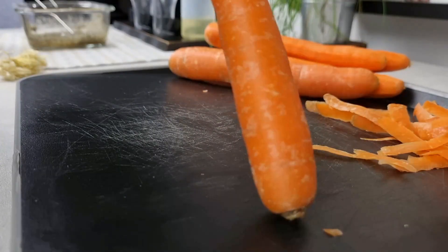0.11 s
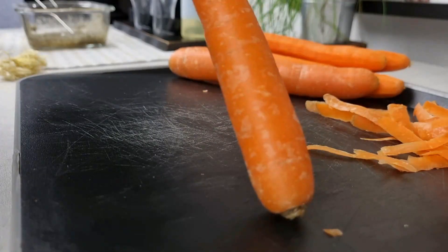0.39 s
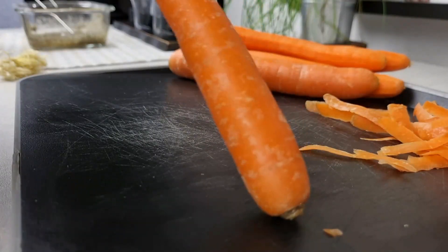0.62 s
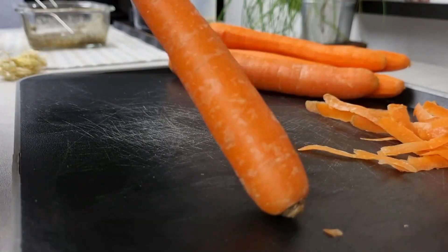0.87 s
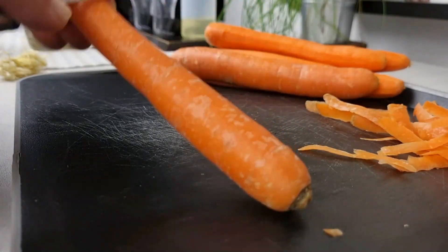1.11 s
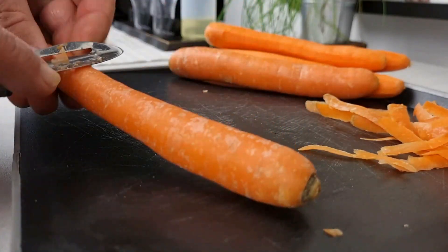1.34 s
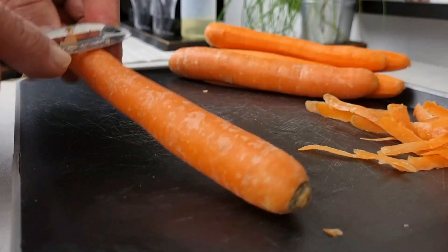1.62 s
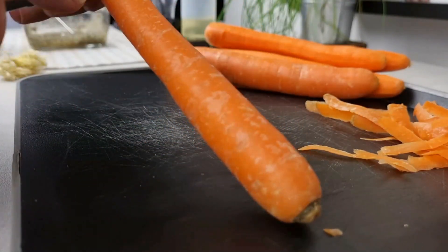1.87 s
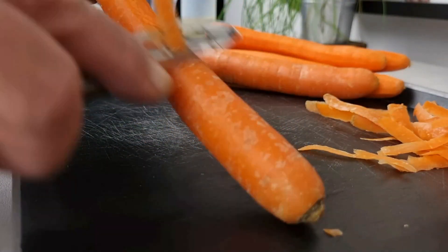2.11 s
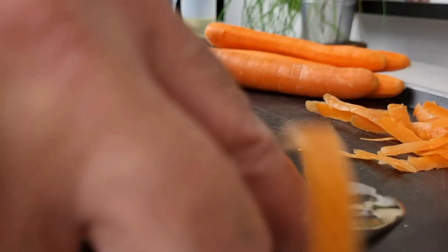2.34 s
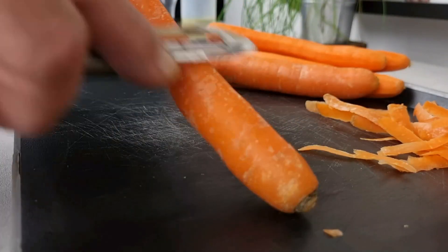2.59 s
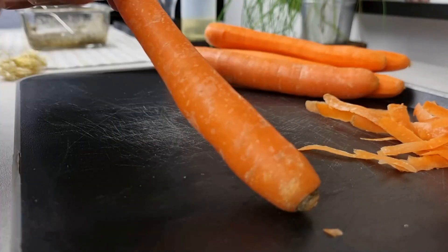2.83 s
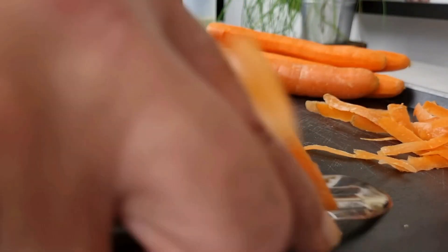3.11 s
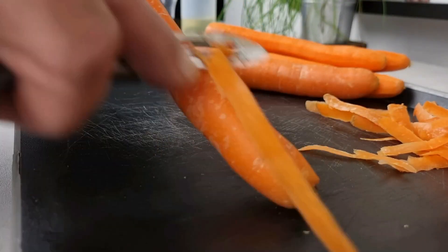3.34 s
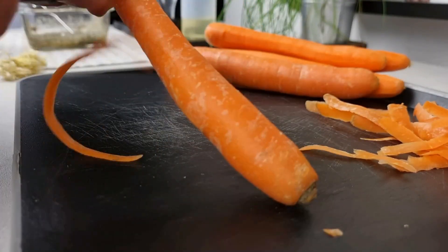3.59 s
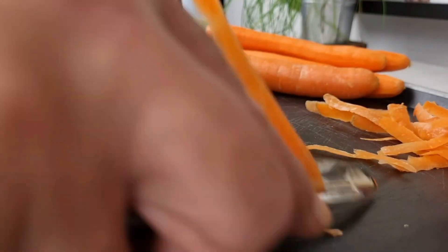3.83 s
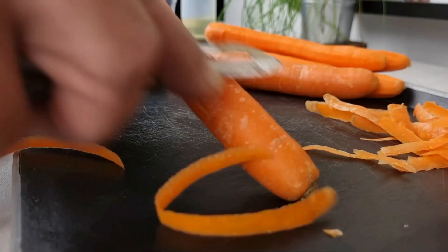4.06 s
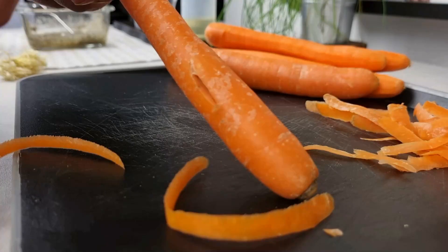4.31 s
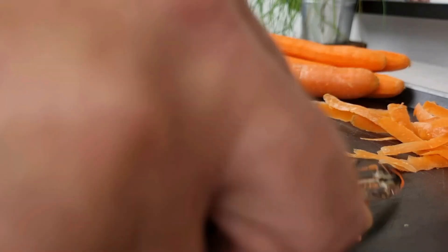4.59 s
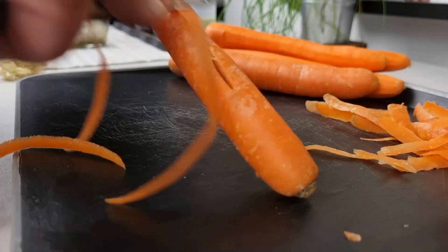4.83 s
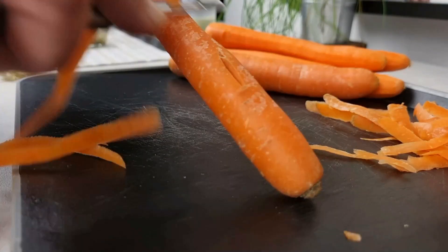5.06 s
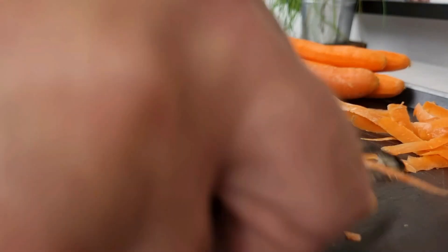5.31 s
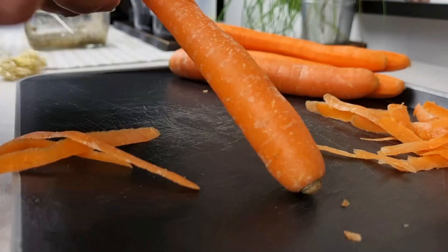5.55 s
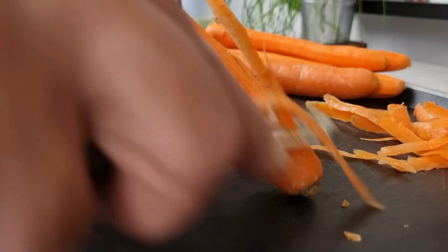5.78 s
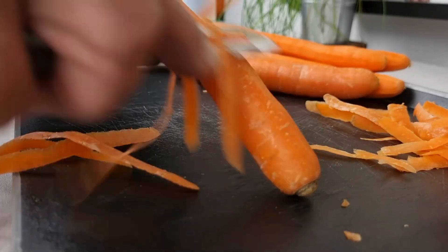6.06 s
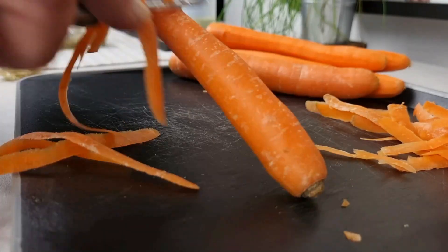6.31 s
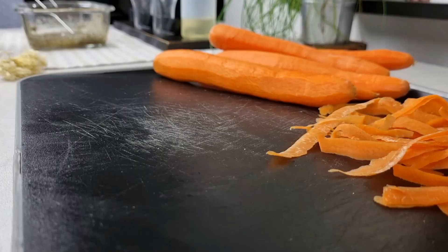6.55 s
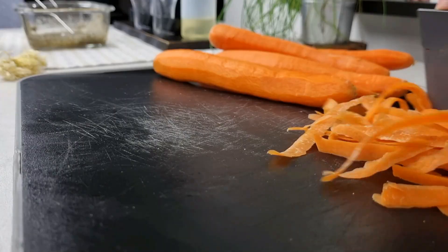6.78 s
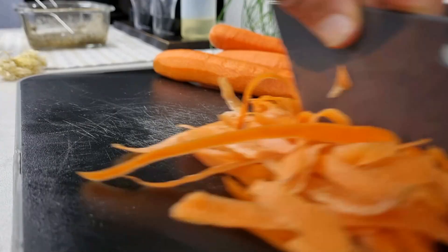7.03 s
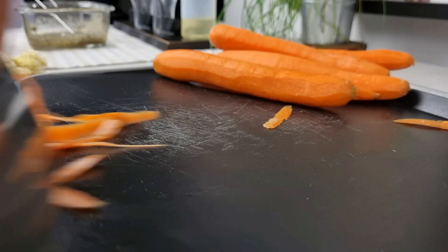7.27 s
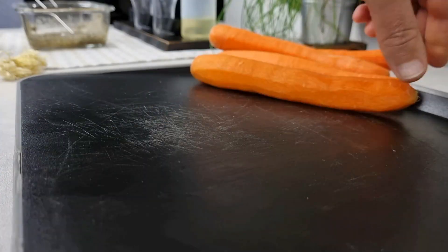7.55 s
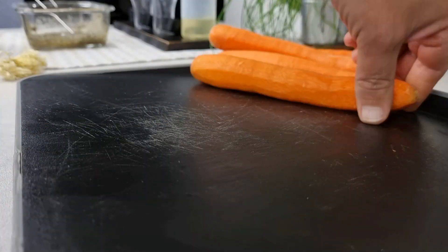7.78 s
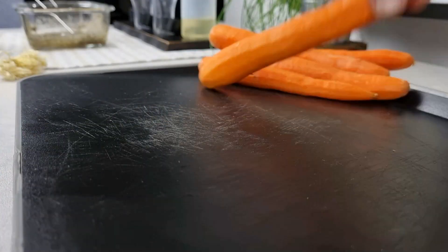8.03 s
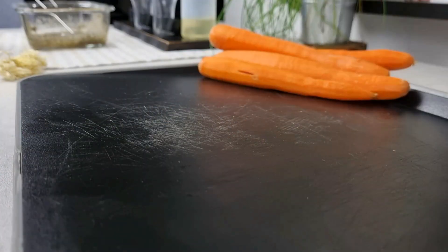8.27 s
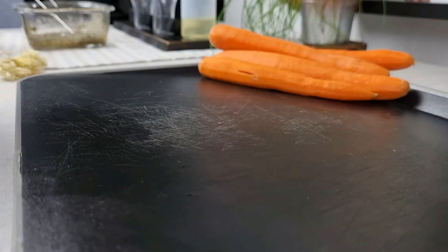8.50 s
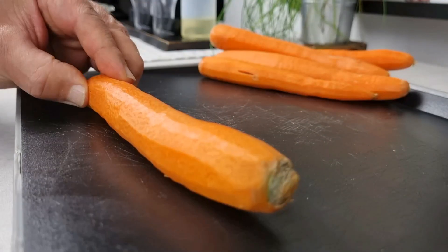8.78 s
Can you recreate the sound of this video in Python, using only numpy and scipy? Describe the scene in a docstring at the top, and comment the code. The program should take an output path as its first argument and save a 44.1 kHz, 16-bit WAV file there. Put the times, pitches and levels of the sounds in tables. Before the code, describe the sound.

A swivel peeler cuts a raw carrot stood on a board, giving short wet hissing rasps that sag slightly in pitch, with low thuds and bright metal rattles between them. After that comes a gritty scraper sweep that climbs higher, a few clattery ticks, a soft carrot placement, a pause and a loud closing knock. Very close microphones, dry room, faint low hum.

```python
"""Peeling a carrot on a plastic board

A swivel peeler cuts down a standing carrot and drags back up: steel modes chatter, torn fibres are coloured
grains, stick-slip rings the board on its counter. Strikes, jolts and ticks excite decaying modes and wavelets.
Later a scraper sweeps the peel aside as rasping grit with a singing edge; carrots are lifted and set down.
A small kitchen answers with sparse echoes, over filtered-noise hum, heard by two close microphones.
"""
import sys
import numpy as np
from scipy import signal
from scipy.fft import rfft, irfft
from scipy.io import wavfile
from scipy.ndimage import uniform_filter1d

SR = 44100
rng = np.random.default_rng(int(sys.argv[2]) if len(sys.argv) > 2 else 0)


def master(y):
    """Save y as 16-bit WAV."""
    cut = np.clip(np.atleast_2d(y).T, -1, 1)
    pcm = np.round(cut * 32767)  # scale
    wavfile.write(sys.argv[1], SR, pcm.astype(np.int16))


def how_loud(loudness_db):
    """Turn decibels into a plain amplitude multiplier (0 dB gives 1, 20 dB gives 10)."""
    steps = np.asarray(loudness_db, float) / 20
    return 10 ** steps


N = 392049
LAG_SAMPLES = -5  # the work lies nearer the left microphone
GRIPS, GRIP_S = 3, 0.07  # states the blade flexes between, and their pace


def read(points, hz):
    """Value of a table at hz, straight on a log axis."""
    f, value = np.transpose(points)
    return np.interp(np.log(hz + 1), np.log(f + 1), value)


def evened(x):
    """Scales to rms 1."""
    return x / np.sqrt(np.mean(x ** 2) + 1e-20)


def follow(level_db):
    """Gain of a dB curve, with edges softened over two milliseconds."""
    return uniform_filter1d(how_loud(level_db), size=90)


def colour(x, points):
    """Filters by a spectrum, which is normalised to mean power 1."""
    gain = how_loud(read(points, np.fft.rfftfreq(x.shape[-1], 1 / SR)))
    return irfft(rfft(x) * gain, x.shape[-1]) / np.sqrt(np.mean(gain ** 2))


def grains(per_s, spread_db):
    """Tiny clicks at random moments, rms 1; a few are large."""
    size = how_loud(spread_db * np.minimum(rng.exponential(1, N), 5))
    size = size * rng.choice([-1, 1], N)
    return evened(size * (rng.random(N) < per_s / SR))


def wide(x, other, alike, lag):
    """The right microphone hears part of the same grains, a few samples apart."""
    alike = np.clip(alike, 0, 1)
    right = alike * x + np.sqrt(1 - alike ** 2) * other
    return np.array([np.roll(x, lag), right])


def patchy(x, depth_db):
    """Random patches of a few hundred Hz swell and fade over tens of milliseconds."""
    z = signal.stft(x, nperseg=256, noverlap=192)[2]
    patches = rng.standard_normal(z.shape[-2:])
    patches = uniform_filter1d(uniform_filter1d(patches, size=4, axis=0), size=30, axis=1)
    gain = how_loud(depth_db * evened(patches))
    return signal.istft(z * evened(gain), nperseg=256, noverlap=192)[1][..., :N]


def drifting(count, slow_s):
    """Random curves of rms 1 that change over slow_s."""
    size = round(slow_s * SR)
    noise = rng.standard_normal((count, N))
    return evened(uniform_filter1d(uniform_filter1d(noise, size), size))


def resonate(x, hz, width_hz):
    """A resonance of the given width that follows the pitch curve hz, rms 1."""
    turn = np.exp(2j * np.pi * np.cumsum(hz * np.ones(N)) / SR)
    r = np.exp(-np.pi * width_hz / SR)
    return evened((turn * signal.lfilter([1 - r], [1, -r], x / turn)).real)


# Balance of the microphones. Each row: frequency in Hz, left over right in dB.
LEAN = [(60, 1), (150, -5.5), (380, -9), (950, -5), (2380, 2.5), (5980, 0), (15000, 22.5)]


def ring(modes, extra_db, damping, lag):
    """Click response in both microphones: neighbouring modes swing opposite ways, the far side lags."""
    hz, db, t60_s = (c[:, None] for c in np.transpose(modes))
    t = np.arange(SR // 2) / SR
    side = np.array([.5, -.5])[:, None, None]
    decay_db = -60 * t * damping / t60_s
    level_db = db + np.reshape(extra_db, (-1, 1)) + decay_db + read(LEAN, hz) * side
    sign = (-1) ** np.arange(len(hz))[:, None]
    left, right = (sign * how_loud(level_db) * np.sin(2 * np.pi * hz * t)).sum(1)
    return np.array([left, np.append(np.zeros(-lag), right[:lag])])


def rubbed(force, response):
    """A running force through a response scaled to a mean energy of 1 per microphone."""
    response = response / np.linalg.norm(response) * np.sqrt(2)
    return signal.oaconvolve(np.atleast_2d(force), response, axes=1)[:, :N]


# Starts in seconds of the stretches; single sounds and echoes stop short where the next one begins.
STRETCH_STARTS_S = [0, 6.668, 7.548]


def add(mix, s, sound):
    """Mixes a sound in at time s; it ends with its stretch."""
    end = min(c for c in [*STRETCH_STARTS_S, N / SR] if c > s)
    part = mix[:, round(s * SR):round(end * SR)][:, :sound.shape[1]]
    part += sound[:, :part.shape[1]]


def arches(start_s, length_s, top, peak_db, steep):
    """dB curve of movements that speed up, peak at a share of their length and slow down; silent between."""
    out = np.full(N, -200.)
    for s, span, share, db in np.broadcast(start_s, length_s, np.clip(top, .05, .95), peak_db):
        at = np.arange(round(s * SR), min(round((s + span) * SR), N))
        arch = np.sin(np.pi * np.linspace(0, 1, len(at)) ** (np.log(.5) / np.log(share)))
        out[at] = np.maximum(out[at], db + steep * 20 * np.log10(abs(arch) + 1e-4))
    return out


# All levels here are relative, ahead of each layer's gain.
# Blade cuts down the carrot. Each row: start in s, length in s, share of the length at top speed,
# top speed in dB, push into the board in dB.
CUTS = [(2.03, 0.38, 0.51, -41.5, -41.5), (2.85, 0.33, 0.61, -41, -43.5), (3.61, 0.29, 0.66, -39.5, -38.5),
        (4.355, 0.26, 0.66, -40, -35.5), (5.062, 0.25, 0.57, -42, -35.5), (5.669, 0.3, 0.56, -41.5, -41.5),
        (6.295, 0.36, 0.55, -42, -38.5)]
# Peeler lands and drags back up. Each row: start in s, length in s, share of the length at top speed,
# top speed in dB, push into the board in dB.
RETURNS = [(2.535, 0.23, 0.45, -59, -39.5), (3.255, 0.24, 0.75, -57.5, -36.5),
           (4.048, 0.23, 0.58, -60.5, -41), (4.74, 0.19, 0.26, -67, -48), (5.448, 0.19, 0.41, -60.5, -43.5),
           (6.09, 0.16, 0.59, -58, -43)]
# Brief skids of the steel and shifts of the grip. Each row: middle in s, length in s, push in dB,
# ringing of the blade in dB, tearing in dB.
SKIDS = [(1.211, 0.3, -59, -86, -111), (1.355, 0.14, -66.5, -80, -89), (1.653, 0.068, -72, -73, -74),
         (1.7, 0.095, -70, -77, -74), (1.856, 0.11, -57.5, -56, -72), (2.01, 0.23, -60, -68.5, -74),
         (2.749, 0.1, -55, -54.5, -61), (3.29, 0.075, -47.5, -60, -48), (3.505, 0.12, -38.5, -54.5, -71),
         (4.927, 0.08, -41.5, -57, -61), (5.025, 0.067, -50.5, -59.5, -69), (5.611, 0.068, -50, -56, -59),
         (6.232, 0.054, -53, -52.5, -67)]
# how steeply each layer follows the arch of the hand's speed: (push, blade, tearing)
CUT_STEEP, RETURN_STEEP, SKID_STEEP = (0.89, 0.72, 1), (0.83, 0.8, 0.79), (4.5, 2.7, 1.8)
CUT_RING_DB, RETURN_RING_DB = -8.5, 8.5  # blade over tearing: it rings less in flesh than skating on skin
PUSH_LINGERS = 1.07  # the hand leans on the carrot a little longer than the blade moves


def hand(count):
    """dB of the push (0), the blade's ringing (1) or the tearing (2) over all cuts, returns and skids."""
    curves = []
    for rows, steep, ring_db in [(CUTS, CUT_STEEP, CUT_RING_DB), (RETURNS, RETURN_STEEP, RETURN_RING_DB)]:
        s, length_s, top, speed_db, push_db = np.transpose(rows)
        stretch = PUSH_LINGERS if count == 0 else 1
        peak_db = [push_db, speed_db + ring_db, speed_db][count]
        curves.append(arches(s, length_s * stretch, top / stretch, peak_db, steep[count]))
    middle_s, length_s, *peak_db = np.transpose(SKIDS)
    curves.append(arches(middle_s - length_s / 2, length_s, 0.47, peak_db[count], SKID_STEEP[count]))
    return np.max(curves, axis=0)


# Hum spectrum. Each row: frequency in Hz, relative density in dB per Hz.
HUM = [(20, -35), (35, -12), (52, 4.5), (70, -17.5), (95, -16.5), (200, -22.5), (450, -27), (1000, -39),
       (3000, -43.5), (8000, -53.5), (16000, -52)]
# Steady hum level in dB, one per stretch.
HUM_DB = [-67, -75, -78]
SHAKE_DB, SHAKE_S = -16.5, 0.63  # the working hand shakes the counter: level re push, smoothing


def hum():
    """Lumpy low rumble of the house over faint air, swelling while the hand works."""
    noise = rng.standard_normal((2, N))
    t = np.arange(N) / SR
    steady = how_loud(np.array(HUM_DB))[np.searchsorted(STRETCH_STARTS_S, t, "right") - 1]
    shake = how_loud(SHAKE_DB) * uniform_filter1d(how_loud(hand(count=0)), round(SHAKE_S * SR))
    shake = shake * (np.arange(N) < STRETCH_STARTS_S[1] * SR)
    return (steady + shake) * evened(colour(wide(*noise, alike=0.83, lag=0), HUM))


# Board on its counter. Each row: mode in Hz, level in dB, t60 in s before damping.
BOARD = [(46, -3.5, 0.59), (78, 1, 0.3), (119, -0.5, 0.2), (169.8, -1.5, 0.28), (211.4, -0.5, 0.35),
         (273, 0, 0.23), (305.3, -1, 0.14), (358.5, -3, 0.2), (405.6, -4.5, 0.94), (486.5, -2, 0.2),
         (570, -7.5, 0.82), (719, -0.5, 0.19), (778.6, 1.5, 0.15), (849.6, -1, 0.089), (1207, 2.5, 0.075),
         (1270, 3, 0.11), (1584, -1.5, 0.034)]
# Blows on the board. Each row: time in s, peak of the board's ring in dB, pitch the struck spot favours in Hz,
# contact time in ms.
KNOCKS = [(0.133, -13.5, 190, 1.4), (0.755, -37, 208, 0.92), (1.43, -48.5, 210, 2.6),
          (1.866, -46.5, 212, 0.81), (2.516, -31, 212, 1.02), (3.262, -32.5, 403, 2.3),
          (3.481, -28.5, 197, 1.31), (4.053, -24.5, 430, 1.74), (4.605, -18.5, 112, 1.45),
          (4.745, -22, 440, 1.7), (5.291, -10.5, 116, 1.86), (5.456, -21.5, 457, 2.27),
          (5.901, -19, 800, 3.84), (5.915, -22.5, 108, 4.3), (6.101, -29, 213, 2.16),
          (6.585, -26.5, 867, 4.1), (7.352, -27, 398, 1.57), (7.408, -29.5, 163.4, 6.7),
          (7.446, -28, 110.4, 1.47), (7.92, -19.5, 715, 1.1), (8.638, -4, 405, 0.67),
          (8.695, -16.5, 86, 2.8)]
# Slap of wet skin on the board. Each row: frequency in Hz, relative density in dB per Hz.
SLAP = [(200, -14), (800, -1.5), (1500, -16), (2500, -27.5), (6000, -35), (10000, -67.5), (16000, -75)]


def knocks():
    """Each blow favours the modes near its spot's pitch; a longer contact is duller and slaps less."""
    hz, out, t = np.transpose(BOARD)[0], np.zeros((2, N)), np.arange(6000) / SR
    noise = rng.standard_normal((len(KNOCKS), 2, len(t)))
    fade = (np.exp(-t / 0.01) + 0.28 * np.exp(-t / 0.058)) * (1 - np.exp(-t / 0.00015))
    for (s, db, spot_hz, contact_ms), puff in zip(KNOCKS, noise):
        touch = np.hanning(max(round(abs(contact_ms) * SR / 1000), 3) + 2)
        sound = ring(BOARD, -6 * abs(np.log2(hz / spot_hz)), 3.0, LAG_SAMPLES)
        # the first swing is the hardest
        sound *= 1 + 2.2 * np.exp(-np.arange(sound.shape[1]) / SR / 0.003)
        sound = signal.fftconvolve(sound, touch[None], axes=1)
        sound /= abs(sound.mean(0)).max()
        # the contact itself pushes the air
        sound[:, :len(touch)] += 0.38 / contact_ms * evened(np.gradient(touch))
        slap = colour(wide(*puff, alike=0.32, lag=LAG_SAMPLES), SLAP)
        sound[:, :len(t)] += how_loud(-22.5) / contact_ms ** 2 * fade * slap
        add(out, s + 0.0014, how_loud(db) * sound)
    return out


# Decay of the room. Each row: frequency in Hz, t60 in s.
KITCHEN = [(100, 0.31), (400, 0.45), (1500, 0.29), (5000, 0.3), (12000, 0.19)]


def kitchen(x):
    """Sparse echoes of random sign, each band dying at its own speed."""
    taps = np.zeros((2, SR // 2))
    at = np.arange(200, SR // 2 - 20, 20) + rng.integers(0, 20, (2, (SR // 2 - 201) // 20))
    np.put_along_axis(taps, at, rng.choice([-1., 1.], at.shape), 1)
    hz, t, z = signal.stft(taps, SR, nperseg=256)
    # long waves reach both microphones alike
    z[1] = np.where(hz[:, None] < 500, .9 * z[0] + .44 * z[1], z[1])
    decay = how_loud(-60 * t / read(KITCHEN, hz)[:, None])
    tail = signal.istft(z * decay, SR, nperseg=256)[1]
    return signal.oaconvolve(x.mean(0)[None], tail / np.linalg.norm(tail[0]), axes=1)[:, :x.shape[1]]


# Short ticks: first the loose peeler, then scraper edge and carrot skin on the board.
# Each row: time in s, peak in dB, pitch in Hz.
TICKS = [(.742, -54, 820), (6.711, -44, 674), (7.3595, -37, 2100), (7.4, -36, 1000), (7.429, -33, 10500),
         (7.4305, -32, 1900), (7.5043, -43, 2700), (7.5369, -40, 2400), (7.901, -52, 4200),
         (8.091, -46, 711)]


def ticks():
    """A short wavelet around one pitch with a little grit."""
    out, t = np.zeros((2, N)), np.arange(500) / SR
    noise = rng.standard_normal((len(TICKS), 2, len(t)))
    for (s, db, hz), puff in zip(TICKS, noise):
        around = [(hz / 4, -24), (hz, 0), (hz * 3, -16), (hz * 8, -40)]
        grit = .7 * evened(colour(puff, around))
        sound = (np.sin(2 * np.pi * hz * t) + grit) * t * np.exp(-t / 0.0012)
        add(out, s - .0005, how_loud(db) * sound / abs(sound.mean(0)).max())
    return out


# Loosely held peeler ticks on its pivot. Each row: time in s, peak in dB.
PIVOT_TICKS = [(0.7511, -42.5), (1.436, -64)]
# Its free frame. Each row: mode in Hz, level in dB, t60 in s before damping.
FRAME = [(900, 4, 0.036), (1200, -7.5, 0.034), (2240, -3, 0.068), (2500, -2, 0.019), (2650, -7, 0.046),
         (4200, 4, 0.042), (4660, -5, 0.067), (5390, -5, 0.096), (6830, -21, 0.13), (7450, -24, .04)]


def pivot():
    """Each light tick rings the ungripped frame."""
    out, sound = np.zeros((2, N)), ring(FRAME, 0, 0.99, LAG_SAMPLES)
    for s, db in PIVOT_TICKS:
        add(out, s, how_loud(db) * sound / abs(sound.mean(0)).max())
    return out


HELD_T60_S, LEAN_DETUNE = .3, .035  # hand and carrot cap the t60 before damping; modes shift as they lean
SLIDE_SQUEAK_DB = 2.5  # skin judders on skin, re slide speed


def board_rub():
    """Stick-slip shakes the board: a slow push in the low modes; a judder higher up grows as the blade bites."""
    hz, db, t60_s = np.transpose(BOARD)
    push = follow(hand(count=0)) * patchy(grains(1300, 3), depth_db=4.5)
    judder = how_loud(1.63 * (hand(count=2) + 41.0) - 40.0)
    scuff = how_loud(SLIDE_SQUEAK_DB + slides(count=3))
    drag = follow(np.maximum(sweep(count=2), slides(count=4))) * grains(480, 2.8)
    lumps = patchy(grains(1100, 3.3), depth_db=3.5)
    forces = [(push, -7 * abs(np.log2(hz / 420)) - 8 * (hz < 100)),
              (drag, -5 * abs(np.log2(hz / 150))),
              (judder * lumps, -14 * np.log2(hz / 800) ** 2),
              (scuff * lumps, -9 * np.log2(hz / 1300) ** 2)]
    lean = how_loud(9 * drifting(GRIPS, 2 * GRIP_S))
    lean /= np.sqrt((lean ** 2).sum(0))
    out = 0
    for share, a in zip(lean, rng.standard_normal((GRIPS, len(hz)))):
        held = np.transpose([hz * (1 + LEAN_DETUNE * a), db, np.minimum(t60_s, HELD_T60_S)])
        for force, favour_db in forces:
            out = out + rubbed(share * force, ring(held, favour_db, 2.6, LAG_SAMPLES)[:, :6000])
    return out


# Steel of the peeler. Each row: mode in Hz, level in dB, t60 in s before damping.
BLADE = [(803, 1.5, 0.065), (876, -1, 0.062), (1139, 2, 0.12), (1233, 0.5, 0.081), (1810, 0.5, 0.12),
         (1940, -3, 0.033), (2400, -9.5, 0.12), (3078, 2, 0.036), (3326, 0.5, 0.037), (3507, -3.5, 0.075),
         (4048, 0.5, 0.04), (4300, 0.5, 0.026), (4473, 1, 0.022), (4960, -8, 0.01), (5336, -9.5, 0.056),
         (6310, -6.5, 0.013), (7394, -2.5, 0.035), (9320, -1.5, 0.023), (11800, -10.5, 0.022),
         (12700, -15, 0.023), (14400, -18.5, 0.04), (14720, -15, 0.092)]
# Tearing fibres. Each row: frequency in Hz, relative density in dB per Hz.
TEAR = [(1200, -9), (2600, -4), (4600, -3), (8400, 1), (9300, -14), (10400, 1.5), (13800, 9), (15600, 3.5),
        (16400, -11.5)]
GRIP_DB, GRIP_DETUNE = 3, .015  # spread of the blade's modes between states


def peeler():
    """The blade rings as it chatters through the skin, its modes shifting as it flexes; fibres tear in clumps."""
    hz, db, t60_s = np.transpose(BLADE)
    grit = wide(grains(5000, 1.7), grains(6300, 3.5), alike=0.11, lag=0)
    skid = follow(hand(count=1)) * patchy(grit, depth_db=5.5)
    flex = how_loud(9 * drifting(GRIPS, GRIP_S))
    flex /= np.sqrt((flex ** 2).sum(0))
    favour_db = -27 * (hz < 2700) - 5 * (hz < 3700) + 1.2 * np.log2(hz / 4000)
    chatter = 0
    for share, (a, b) in zip(flex, rng.standard_normal((GRIPS, 2, len(hz)))):
        bent = np.transpose([hz * (1 + GRIP_DETUNE * a), db + GRIP_DB * b, t60_s])
        chatter = chatter + rubbed(share * skid, ring(bent, favour_db, 3.2, -2))
    clumps = evened(how_loud(2.6 * drifting(1, .003)))
    cells = patchy(wide(grains(9100, 3.0), grains(11000, 1.9), alike=0.11, lag=LAG_SAMPLES), depth_db=3)
    sides = how_loud([[-1.5], [1.5]])  # left, right
    tearing = colour(follow(hand(count=2)) * clumps * cells * sides, TEAR)
    return how_loud(6.5) * chatter + how_loud(5.0) * tearing


# Jolts of the loose blade. Each row: time in s, peak in dB, hardness in dB per octave.
CLACKS = [(1.842, -60, 14), (2.0904, -24.5, 12), (2.5164, -40.5, 8), (2.557, -51, 1), (2.858, -51, 5),
          (3.1746, -15.5, -2), (3.262, -45, 5), (4.389, -48, 12), (5.076, -54, 3.5), (5.899, -5.5, -1),
          (6.5823, -5.5, -1)]
CLACK_S = 0.0042  # rattle length at -5 dB, over a floor of 1 ms
BOUNCE_S, BOUNCE_DB = 0.0088, -10  # the blade falls back once: delay after the row's time, level


def clacks():
    """A rattle, longer for louder jolts, rings the steel a little differently each time; then one bounce."""
    (hz, mode_db, t60_s), out, t = np.transpose(BLADE), np.zeros((2, N)), np.arange(600) / SR
    rattle = rng.standard_normal((len(CLACKS), 2, len(t)))
    chance = rng.standard_normal((len(CLACKS), 4, len(hz)))
    for (s, db, tilt_db), shake, (a, b, c, d) in zip(CLACKS, rattle, chance):
        shake = shake * np.exp(-(t / (.001 + CLACK_S * how_loud(db + 5))) ** 3)
        shake[:, 0] = 7  # the first contact is the hardest
        favour_db = tilt_db * np.log2(hz / 4000) - 5 * (hz > 6600)
        sound = 0
        # each mode and two side modes
        for detune, spread_db in [(.006 * a, 2 * b), (.02 * c, 2 * d - 3), (.03 * d, 2 * a - 5)]:
            bent = np.transpose([hz * (1 + detune), mode_db + spread_db, t60_s])
            sound = sound + ring(bent, favour_db, 1.3, lag=-2)
        # the hand soon grips the steel
        sound *= 1 + 4 * np.exp(-np.arange(sound.shape[1]) / SR / .0025)
        sound = signal.fftconvolve(sound, wide(*shake, alike=0.48, lag=0), axes=1)
        sound[:, :len(t)] += 22 * uniform_filter1d(shake, size=4)  # the bare crack
        sound *= how_loud(db) / abs(sound.mean(0)).max()
        add(out, s + 0.0015, sound)
        add(out, s + BOUNCE_S, how_loud(BOUNCE_DB) * sound)
    return out


BITE_HZ, BITE_WIDTH_HZ = (4260, 3300), 600  # pitch at start and end of a cut, width
BITE_DB = -7.5  # re speed of the cut


def bite():
    """The blade's loaded edge hisses around one pitch that sags as it digs deeper along each cut."""
    s, length_s, _, speed_db, _ = np.transpose(CUTS)
    ends_s = np.ravel([s, s + length_s], "F")
    hz = np.interp(np.arange(N) / SR, ends_s, np.tile(BITE_HZ, len(s)))
    grit = wide(grains(3000, 2.3), grains(3000, 3.0), alike=.4, lag=LAG_SAMPLES)
    cutting_db = arches(s, length_s, 0.47, speed_db + BITE_DB, 0.48)
    return follow(cutting_db + 3.4 * drifting(1, .01)[0]) * resonate(grit, hz, BITE_WIDTH_HZ)


# Scraper sweeps the peel aside. Each row: time in s, relative speed in dB, relative weight on the board in dB,
# pitch of the singing edge in Hz.
SWEEP = [(6.708, -53, -42.5, 1100), (6.779, -46.5, -62, 1060), (6.85, -43, -80, 1270),
         (7.06, -41, -67, 1180), (7.22, -38, -67, 1470), (7.32, -38, -64, 2340), (7.355, -38, -62, 2320),
         (7.384, -46.5, -36, 1700), (7.546, -52, -87, 1200)]


def sweep(count):
    """dB of the scraper's speed (1) or weight (2), or the pitch of its edge (3), straight between rows."""
    rows = np.transpose(SWEEP)
    return np.interp(np.arange(N) / SR, rows[0], rows[count], left=-200, right=-200)


# A carrot slides on its neighbours. Each row: start in s, length in s, share of the length at top speed,
# relative top speed in dB, relative weight in dB.
SLIDES = [(7.802, 0.064, 0.78, -75.5, -56), (7.871, 0.058, 0.75, -55, -70),
          (7.91, 0.085, 0.069, -75, -40.5), (8.019, 0.077, 0.72, -63, -58),
          (8.081, 0.077, 0.75, -48, -50.5)]


def slides(count):
    """dB of the sliding carrot's speed (3) or weight (4), arched over each slide."""
    rows = np.transpose(SLIDES)
    return arches(*rows[:3], rows[count], steep=0.52)


# Rasp at middling speed. Each row: frequency in Hz, relative density in dB per Hz.
RASP = [(150, -39), (260, -7), (720, -6), (1300, 0.5), (2200, -5.5), (3400, -3), (5500, -11), (10000, -25)]
RASP_TURN_DB, RASP_SPAN_DB = -38, 15  # middling speed, and the distance to slowest and fastest
RASP_SLOW, RASP_FAST = 0.4, 1.8  # pitch factors of the rasp there
FINE_DB, FINE_GROWTH = -53, 2.4  # fine treble at a speed of -40 dB ahead of its gain, dB per dB of speed


def drags():
    """Fine grit under an edge; the faster the scraper, the higher and brighter its rasp."""
    grit = wide(grains(14000, 0.75), grains(15000, 3.3), alike=0.2, lag=2 * LAG_SAMPLES)
    grit = patchy(grit, depth_db=2.0)
    fine = signal.lfilter(*signal.butter(1, 4000, "high", fs=SR), grit)
    speed_db = sweep(count=1)
    pace = np.clip((speed_db - RASP_TURN_DB) / RASP_SPAN_DB, -1, 1)
    shares = np.sqrt([np.maximum(-pace, 0), 1 - abs(pace), np.maximum(pace, 0)])
    slow, even, fast = (colour(grit, [(hz * k, db) for hz, db in RASP]) for k in (RASP_SLOW, 1, RASP_FAST))
    rasp = follow(speed_db) * (shares[0] * slow + shares[1] * even + shares[2] * fast)
    slide = follow(slides(count=3)) * even
    treble = follow(FINE_DB + FINE_GROWTH * (speed_db + 40)) * fine
    return how_loud(-2.0) * (rasp + slide) + how_loud(4.5) * treble


EDGE_DB, EDGE_WIDTH_HZ = -7, 310  # level re speed at 1200 Hz, width


def edge():
    """The scraper's edge sings roughly on the board, louder as its pitch and speed rise."""
    grit = wide(grains(2500, 3.4), grains(2500, 5.1), alike=0.27, lag=2 * LAG_SAMPLES)
    hz = sweep(count=3)
    song = resonate(grit, np.maximum(hz, 0), EDGE_WIDTH_HZ)
    level_db = EDGE_DB + 6 * np.log2(np.maximum(hz, 1) / 1200) + sweep(count=1)
    return follow(level_db + 2.5 * drifting(1, .02)[0]) * song


def scene():
    """Sums all contact; each stretch has its own echo, which ends with it; the hum lies beneath."""
    contact = board_rub() + peeler() + bite() + drags() + edge() + knocks() + clacks() + pivot() + ticks()
    parts = np.split(contact, [round(s * SR) for s in STRETCH_STARTS_S[1:]], axis=1)
    return np.hstack([p + how_loud(-9.5) * kitchen(p) for p in parts]) + hum()


def low_pass(x):
    """Removes everything above the highest recorded frequency."""
    return signal.sosfilt(signal.butter(12, 16820, fs=SR, output="sos"), x)


def record(dry):
    """The microphones drop the deepest bass and the very top."""
    heard = signal.lfilter(*signal.butter(2, 28, "high", fs=SR), dry)
    heard = signal.oaconvolve(heard, signal.firwin(255, 16100, fs=SR)[None], "same")
    return low_pass(heard)


dry = scene()
out = record(dry)
master(out)
```